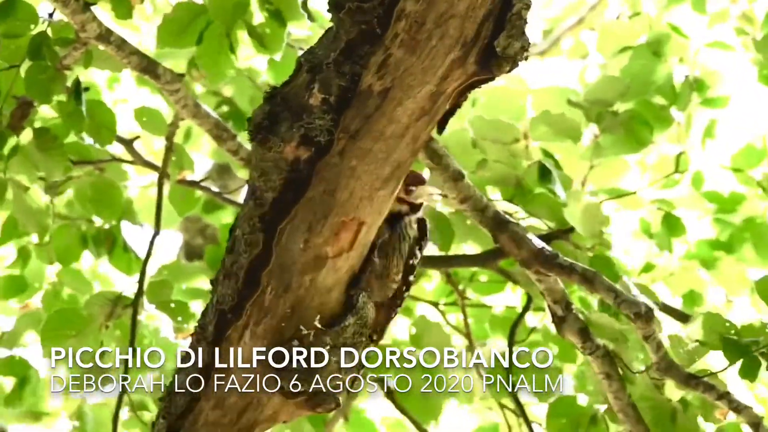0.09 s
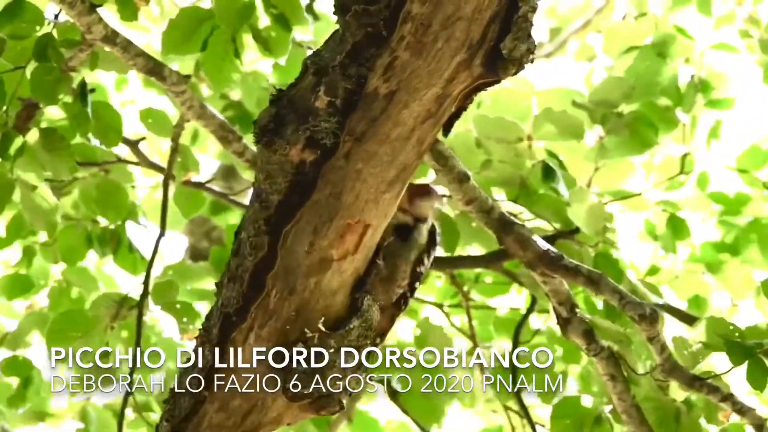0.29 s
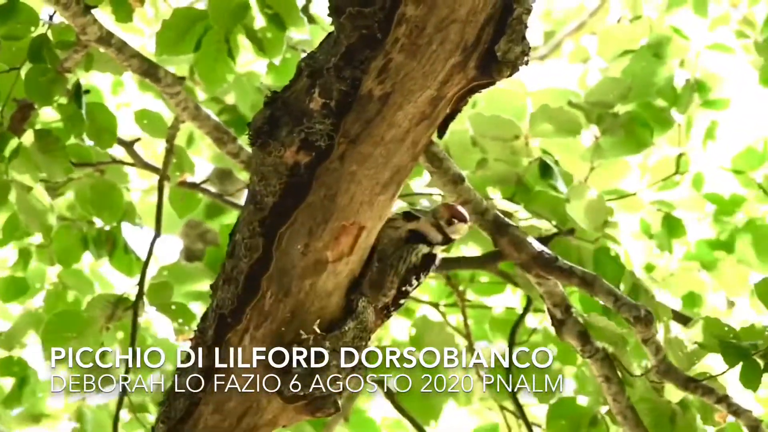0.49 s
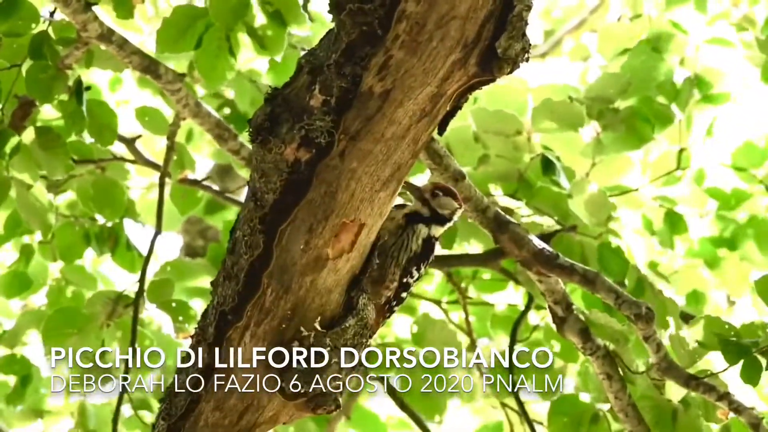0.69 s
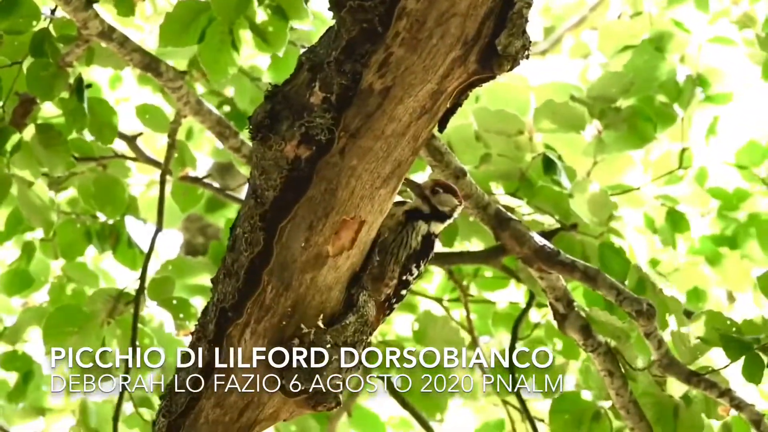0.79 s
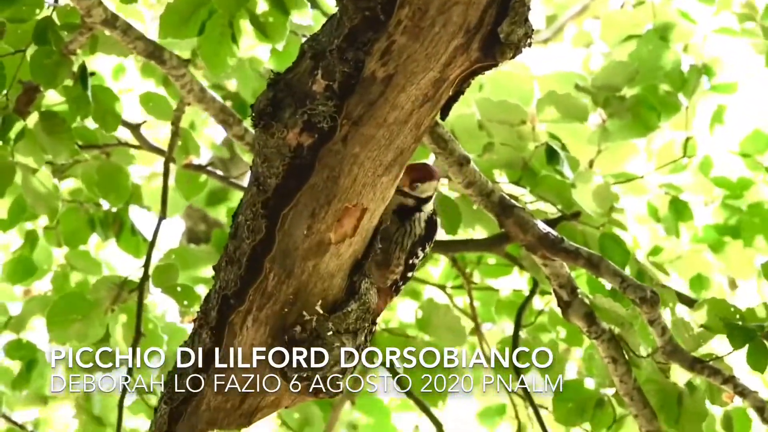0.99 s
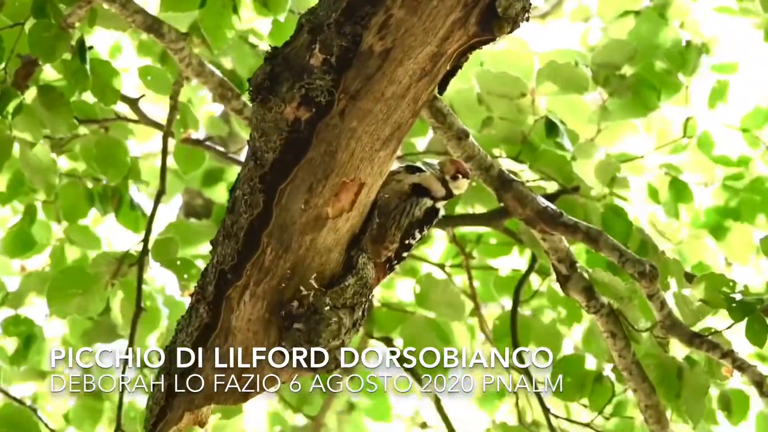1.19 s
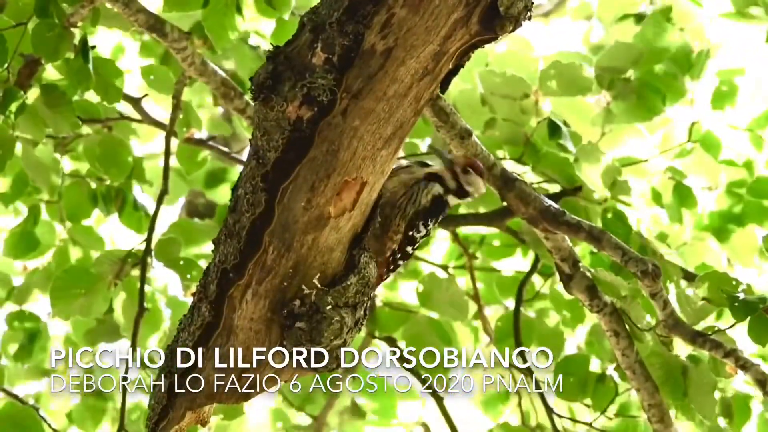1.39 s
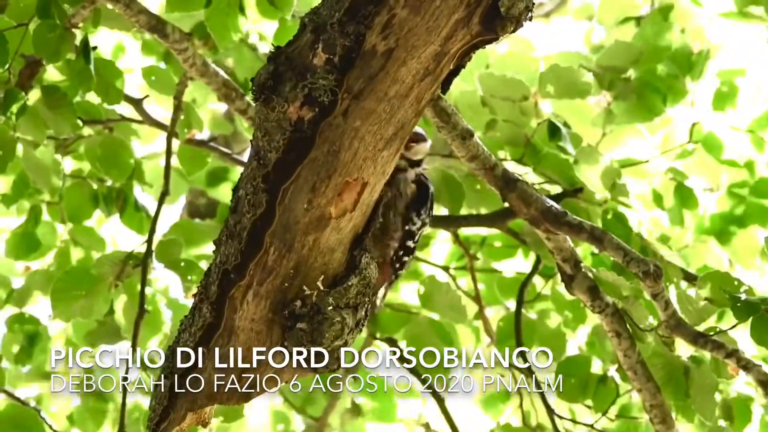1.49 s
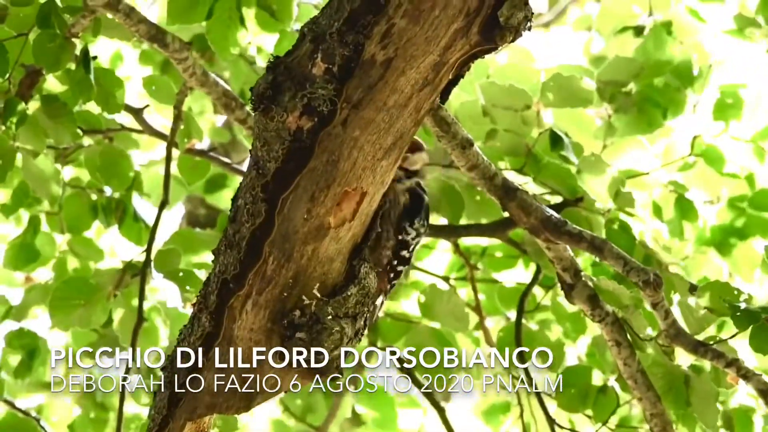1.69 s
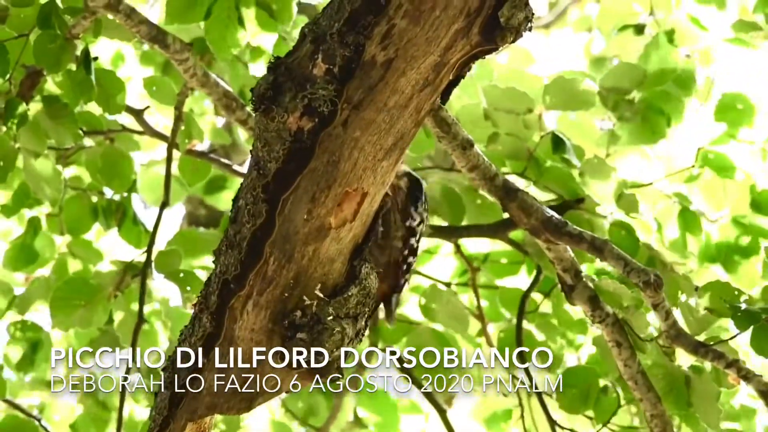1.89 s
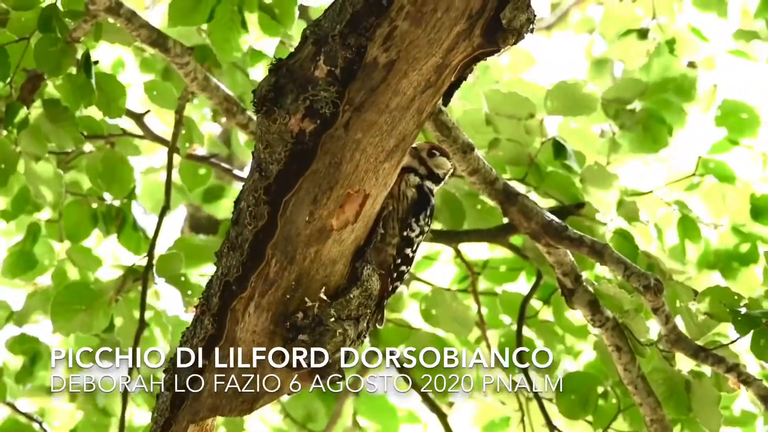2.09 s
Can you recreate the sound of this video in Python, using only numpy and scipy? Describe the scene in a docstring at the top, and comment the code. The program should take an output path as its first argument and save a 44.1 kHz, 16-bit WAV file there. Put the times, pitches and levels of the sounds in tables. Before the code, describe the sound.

A sharp dry click snaps right beside the microphone, followed by two softer ones close together. Five thin, high chirps come after, over faint far woodpecker knocks, light wind rumble and soft forest hiss.

```python
"""Three sharp dry clicks sound right by the right microphone, the first led in by a short scrape;
a distant woodpecker pecks faintly in a quiet forest. Each impact excites damped modes.
A small bird gives five high chips from the two voices of its syrinx, and far birds whistle faintly;
their calls reverberate among the trees. Light wind rumbles on the microphone ports over a soft hiss."""
import sys
import numpy as np
from scipy import signal
from scipy.fft import rfft, irfft, next_fast_len
from scipy.io import wavfile
from scipy.ndimage import uniform_filter1d, map_coordinates

SR = 44100
rng = np.random.default_rng(int(sys.argv[2]) if len(sys.argv) > 2 else 0)


def to_wav(s):
    """Save 16-bit WAV."""
    ch = np.atleast_2d(s).T  # columns
    pcm = np.round(np.clip(ch, -1, 1) * 32767)  # PCM
    wavfile.write(sys.argv[1], SR, pcm.astype(np.int16))


N = 94815


def clicks():
    """Impact excitation: hard contacts ring short modes and damp them; the left port lies in shadow."""
    # clicks and the light touches before them: t/s, level/dB, tilt/(dB/octave), hollow ring/dB,
    # thump/dB, crack/dB, pitch ratio, damping time/s, rise time/s
    contacts = [(.2452, -15.5, 7, -42, -34, -9, 0.96, 0.0094, 0.0014),
                (0.2518, -3, 1, -31.5, -54, -21.5, 0.94, 0.0051, 0.00021),
                (1.0506, -37.5, -22, -22, -6, -23, 0.92, 0.0044, 0.00018),
                (1.0615, -16, -11.5, -27, -16.5, -22.5, 0.96, 0.015, .0008),
                (1.1031, -15, -9.5, -8.5, -28, -24, 0.893, 0.0067, 0.00054)]
    # modes of the click: f/Hz, level/dB, T60/s
    modes = [(2174, 2.5, 0.011), (2474, -9, 0.0074), (3040, -18.5, .009), (3720, -10, 0.016),
             (4383, 0, 0.0078), (5565, -3.5, 0.011), (6130, -7.5, 0.01), (6650, -2, 0.0046),
             (8500, -30, 0.00487), (10750, -20.5, 0.0022)]
    # left port relative to right: f/Hz, level/dB
    shadow = [(200, -9.5), (1100, -11.5), (2100, -27), (3000, -22), (4400, -5.5), (6200, -32), (9000, 2.5),
              (14000, 0.5)]
    bend, bend_s, left_lag_s = 0.11, 0.0011, 0.00007
    out, t = np.zeros(N), np.arange(SR // 10) / SR
    bent_t = t + bend * bend_s * (1 - np.exp(-t / bend_s))  # the ring starts sharp: stiff contact
    for s, db, tilt_db, hollow_db, thump_db, crack_db, ratio, damped_s, rise_s in contacts:
        body = amp(hollow_db) * ring(t, hz=1180, t60=0.028) + amp(crack_db) * crack(t, t60=0.027)
        for k, (hz, mode_db, t60) in enumerate(modes):
            gain = amp(mode_db + tilt_db * np.log2(hz / modes[0][0]))
            polarity = (-1) ** (k // 2)
            body += gain * polarity * ring(bent_t, hz * ratio, t60)
        envelope = onset(t, rise_s) / (1 + (t / damped_s) ** 6)
        thump = amp(thump_db) * ring(t, hz=231.5, t60=0.047) * onset(t, rise_s=0.00077)
        add(out, s, amp(db) * (body * envelope + thump))
    right = out + scrape()
    left = filtered(right, lambda hz: amp(along(shadow, hz)) * delay(hz, left_lag_s))
    return np.array([left, right]) + amp(-45) * forest(out)


def scrape():
    """Friction noise: grainy rubbing swells into the first click and dies just after it."""
    # friction spectrum: f/Hz, level/dB
    spectrum = [(300, -12), (1500, -3), (2130, 19), (2900, 4), (4500, 2.5), (6500, -7), (8000, -27),
                (11000, -20), (16000, -33)]
    peak_s, peak_db, swell_db_per_s, fade_db_per_s = 0.2545, -38.5, 224, 560
    t = np.arange(N) / SR - peak_s
    level_db = peak_db + np.minimum(swell_db_per_s * t, -fade_db_per_s * t)
    return amp(level_db + 0.73 * wobble(rate=160)) * noise(spectrum)


def pecks():
    """Compliant impact: a distant woodpecker knocks on soft bark, dulled by a second-order low-pass."""
    # knocks: t/s, level/dB, tilt/(dB/octave)
    knocks = [(0.0727, -45.5, -10.5), (0.0816, -53.5, 4.5), (1.484, -54.5, 16), (1.6829, -58, -19.5),
              (1.856, -55.5, 10)]
    # bark modes: f/Hz, level/dB, T60/s
    modes = [(440, -4.5, 0.01), (815, -4, 0.028), (1205, 5, 0.018), (1340, 5, 0.012), (2022, -8, 0.017),
             (2650, -48, .01)]
    pivot_hz, cutoff_hz = modes[2][0], 1900
    out, t = np.zeros(N), np.arange(SR // 10) / SR
    for s, db, tilt_db in knocks:
        wood = np.zeros(len(t))
        for hz, mode_db, t60 in modes:
            gain = amp(mode_db + tilt_db * np.log2(hz / pivot_hz) + rng.normal(0, 0.67))
            wood += gain * ring(t, hz, t60)
        knock = wood + amp(11.5) * crack(t, t60=0.015)
        add(out, s, amp(db) * knock * onset(t, rise_s=0.0016))
    out = filtered(out, lambda hz: 1 / (1 + 1j * hz / cutoff_hz - (hz / cutoff_hz) ** 2))
    return out + amp(-1) * forest(out)


def chips():
    """Source and filter: two raspy voices of the syrinx arch in pitch and are coloured by the beak."""
    # chips: t/s, level/dB, top f/Hz, roughness (0-1)
    calls = [(1.412, -40.5, 2694, 0.65), (1.5767, -40.5, 2631, 0), (1.7098, -39.5, 2722, 0.52),
             (1.902, -40.5, 2632, 0.17), (2.0166, -43.5, 2549, .6)]
    # harmonics 1-4 of the main voice: level/dB
    harmonics = [-10, -0.5, -22, -17]
    # beak response: f/Hz, level/dB
    beak = [(2000, -4), (3500, -5), (5200, 4), (6800, -4.5), (8300, -9), (11000, -21)]
    top_s, attack_db_per_s, release_db_per_s, rasp_per_s = 0.012, 1288, 959, 1421
    upper_ratio, upper_lead_s, upper_db = 2.62, 0.0046, -12  # second voice: higher, peaks earlier
    pan_db, left_lag_s = -4, 0.00021
    out, t = np.zeros(N), np.arange(SR // 30) / SR
    past_top = t - top_s
    envelope = amp(np.minimum(attack_db_per_s * past_top, -release_db_per_s * past_top))
    upper_envelope = amp(upper_db - release_db_per_s * np.maximum(past_top, 0))
    for s, db, top_hz, roughness in calls:
        main = arch(t, top_s, top_hz, roughness, rasp_per_s)
        upper = arch(t, top_s - upper_lead_s, top_hz * upper_ratio, roughness, rasp_per_s)
        partials = [(envelope * amp(level), k * main) for k, level in enumerate(harmonics, 1)]
        voices = np.zeros(len(t))
        for gain, phase in partials + [(upper_envelope, upper)]:
            pitch_hz = np.abs(np.gradient(phase)) * SR / (2 * np.pi)
            voices += gain * amp(along(beak, pitch_hz)) * np.sin(phase)
        rasp = 1 + 0.36 * wobble(rasp_per_s)[:len(t)]
        add(out, s, amp(db) * voices * rasp * np.tanh(t / 0.00079))
    sides = np.array([[0.5], [-0.5]])
    direct = filtered(out, lambda hz: delay(hz, left_lag_s * sides))
    return (direct + amp(-1.5) * forest(out)) * amp(pan_db * sides)


def arch(t, top_s, top_hz, roughness, jitter_per_s):
    """Frequency modulation: the phase of a jittery note that rises to its top pitch, then drops."""
    rise_oct, rise_s, fall_oct_per_s = 0.206, 0.012, 39
    before, after = np.maximum(top_s - t, 0), np.maximum(t - top_s, 0)
    octaves = -rise_oct * (before / rise_s) ** 2 - fall_oct_per_s * after * np.tanh(after / 0.0048)
    jitter = 0.1 * roughness * wobble(jitter_per_s)[:len(t)]
    return 2 * np.pi * np.cumsum(top_hz * 2 ** octaves * (1 + jitter)) / SR


def far_birds():
    """Linear chirps: faint gliding whistles, with reverberation as strong as the direct sound."""
    # whistles: t/s, duration/s, start f/Hz, end f/Hz, level/dB
    notes = [(0, 0.01, 7170, 6670, -59), (0.039, 0.028, 6100, 5200, -62.5),
             (.755, 0.044, 2140, 2855, -68.5)]
    out = np.zeros(N)
    for s, length_s, start_hz, end_hz, db in notes:
        pitch_hz = np.linspace(start_hz, end_hz, round(length_s * SR))
        phase = 2 * np.pi * np.cumsum(pitch_hz) / SR
        add(out, s, amp(db) * np.hanning(len(phase)) * np.sin(phase))
    return out + forest(out)


def wind():
    """Turbulent pressure: light wind rumbles independently at each port, with a few soft buffets."""
    # rumble spectral density: f/Hz, level/dB
    rumble = [(15, -8), (35, -2.5), (65, 0.5), (110, -3.5), (160, -15), (230, -16.5), (400, -37.5),
              (1000, -68), (3000, -52)]
    # wind at the left port: t/s, level/dB
    left = [(0, -61), (.22, -74), (.27, -47.5), (.36, -65.5), (.52, -69), (.62, -51.5), (.78, -55),
            (.95, -57.5), (1.25, -68.5), (1.7, -64.5), (1.98, -55), (2.15, -63)]
    # wind at the right port: t/s, level/dB
    right = [(0, -49.5), (.16, -44.5), (.25, -41.5), (.34, -50.5), (.5, -57.5), (0.699, -58.5), (.83, -69),
             (.92, -55.5), (1.03, -44), (1.168, -51.5), (1.42, -51.5), (1.6, -62.5), (1.78, -64),
             (1.85, -52.5), (1.969, -48), (2.069, -56.5), (2.15, -43.5)]
    # single pushes: t/s, level/dB, left minus right/dB
    buffets = [(.413, -44, -32), (0.874, -43, 22), (1.233, -42.5, -20), (1.428, -47, -29)]
    flutter_db, buffet_s, buffet_hz = 3, 0.0074, 69.4
    ports, t = np.zeros((2, N)), np.arange(N) / SR
    for port, levels in zip(ports, (left, right)):
        turbulence = unit(noise(rumble) * amp(flutter_db * wobble(rate=28)))
        port += amp(np.interp(t, *np.transpose(levels))) * turbulence
    for s, db, pan_db in buffets:
        share = amp(np.array([[pan_db], [-pan_db]]) / 2)
        push = np.exp(-((t - s) / buffet_s) ** 2) * np.sin(2 * np.pi * (buffet_hz * t + rng.random()))
        ports += 2 * amp(db) * push * share / np.linalg.norm(share)
    return ports


def air():
    """Partial coherence: the soft forest hiss sounds wide because the ports share little of it."""
    # hiss spectral density: f/Hz, level/dB
    spectrum = [(30, -13), (230, -1), (450, -3), (900, -8), (1600, -11.5), (2100, -10), (2800, -14.5),
                (5000, -14.5), (6600, -13.5), (7600, -33.5), (11000, -23), (16000, -21)]
    level_db, correlation = -60.5, 0.11
    common = noise(spectrum)
    separate = np.array([noise(spectrum), noise(spectrum)])
    return amp(level_db) * (np.sqrt(correlation) * common + np.sqrt(1 - correlation) * separate)


def forest(x):
    """Reverberation by scattering: nearby branches answer quickly, the trunks give a long stereo tail."""
    # reverberation time: f/Hz, T60/s
    decay = [(300, .25), (2000, 0.33), (5000, 0.63), (10000, 1)]
    early_db, early_t60_s = -1.5, 0.0381
    hz, t, spectra = signal.stft(rng.standard_normal((2, SR * 3 // 4)), SR, nperseg=256)
    trunks = amp(-60 * t / along(decay, hz)[:, None])
    branches = amp(early_db - 60 * t / early_t60_s)
    response = signal.istft(spectra * (trunks + branches), SR, nperseg=256)[1]
    delayed = np.pad(x, (SR // 300, 0))[None]
    return signal.fftconvolve(delayed, response / np.linalg.norm(response[0]), axes=1)[:, :N]


def ring(t, hz, t60):
    """Free vibration of one damped mode."""
    return np.sin(2 * np.pi * hz * t) * 1000 ** (-t / t60)


def crack(t, t60):
    """Exponentially decaying noise, its treble softened by a moving average."""
    return unit(uniform_filter1d(rng.standard_normal(len(t)), size=3)) * 1000 ** (-t / t60)


def onset(t, rise_s):
    """First-order rise from 0 to 1."""
    return 1 - np.exp(-t / rise_s)


def noise(spectrum):
    """Spectrally shaped noise of rms 1."""
    return unit(filtered(rng.standard_normal(N), lambda hz: amp(along(spectrum, hz))))


def wobble(rate):
    """Smooth random modulation with `rate` knots a second."""
    return map_coordinates(rng.standard_normal(N // 16), [np.arange(N) * rate / SR])


def filtered(x, response):
    """Linear filtering: the spectrum of x times a frequency response."""
    size = next_fast_len(N + SR // 2)
    return irfft(rfft(x, size) * response(np.fft.rfftfreq(size, 1 / SR)), size)[..., :N]


def delay(hz, lag_s):
    """Linear phase response of a pure delay."""
    return np.exp(-2j * np.pi * hz * lag_s)


def along(points, hz):
    """Interpolation of (f/Hz, value) points on a logarithmic frequency axis."""
    f, values = np.transpose(points)
    return np.interp(np.log(hz + 1), np.log(f + 1), values)


def amp(db):
    """Decibels to amplitude ratio."""
    return 10 ** (np.asarray(db) / 20)


def unit(x):
    """Normalisation to rms 1."""
    return x / np.sqrt(np.mean(x ** 2) + 1e-20)


def add(track, s, sound):
    """Superposition of a sound on a track, starting at s seconds."""
    part = track[round(s * SR):][:len(sound)]
    part += sound[:len(part)]


def scene():
    """Superposition of all sources at the two ports."""
    return clicks() + pecks() + chips() + far_birds() + wind() + air()


def record(dry):
    """Clipping and band limiting: peaks stop at full scale; the treble rolls off, then ends steeply."""
    rolloff_hz, limit_hz = 14300, 16000
    rolloff = lambda hz: 1 / np.sqrt(1 + (hz / rolloff_hz) ** 6)
    edge = lambda hz: 0.5 - 0.5 * np.tanh((hz - limit_hz) / 250)
    return filtered(np.clip(dry, -1, 1), lambda hz: rolloff(hz) * edge(hz))


dry = scene()
out = record(dry)
to_wav(out)
```